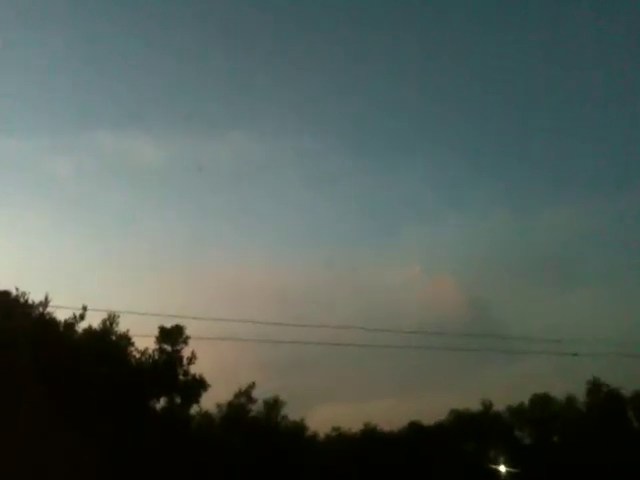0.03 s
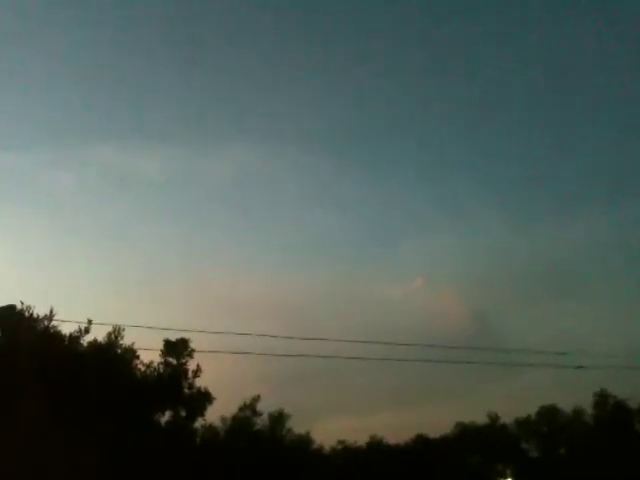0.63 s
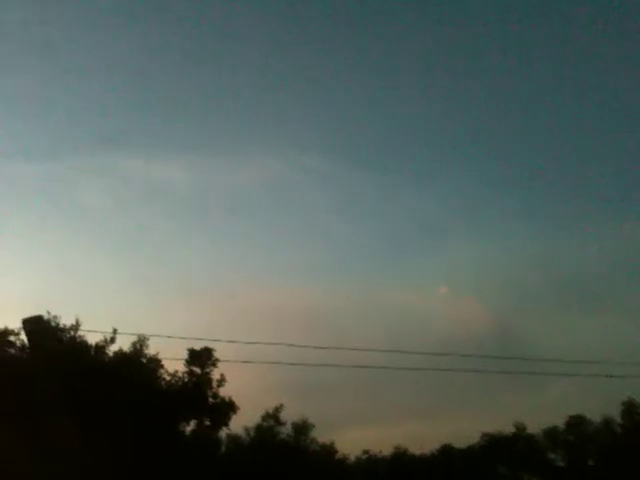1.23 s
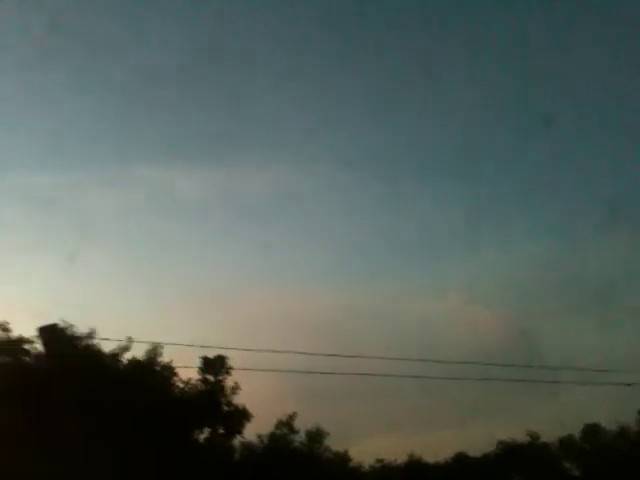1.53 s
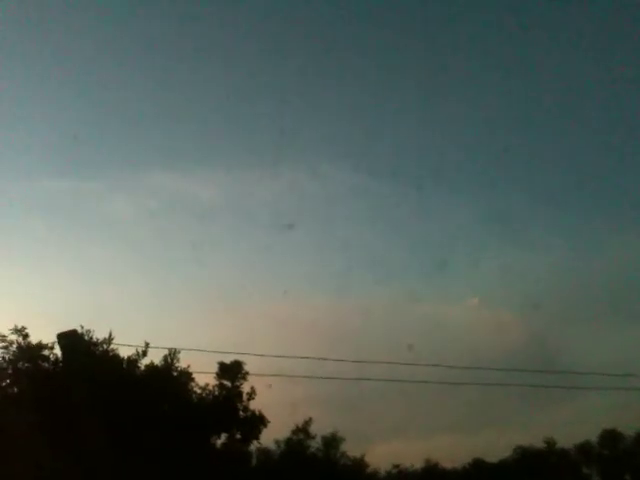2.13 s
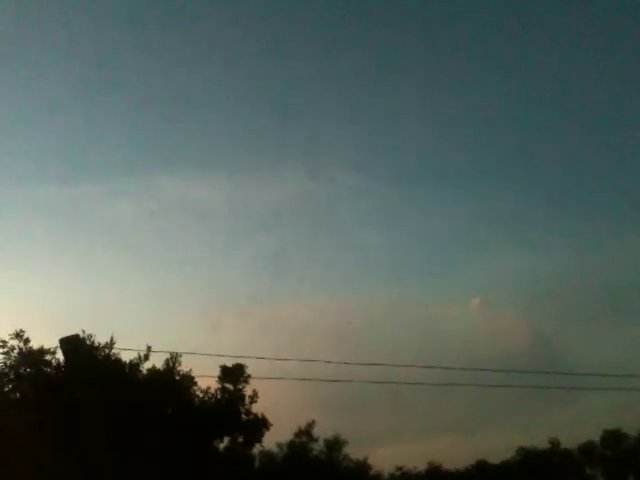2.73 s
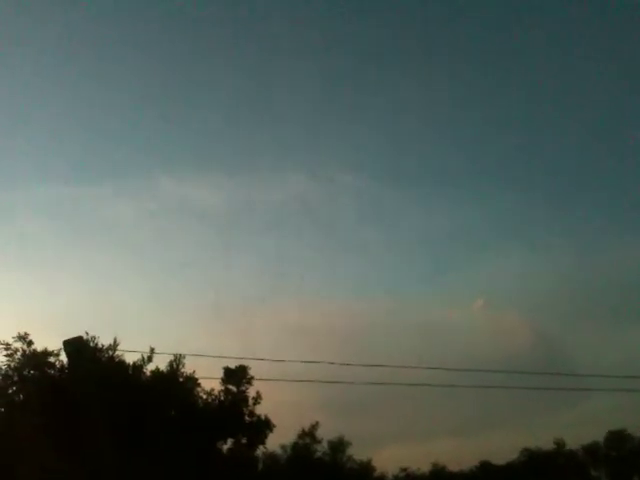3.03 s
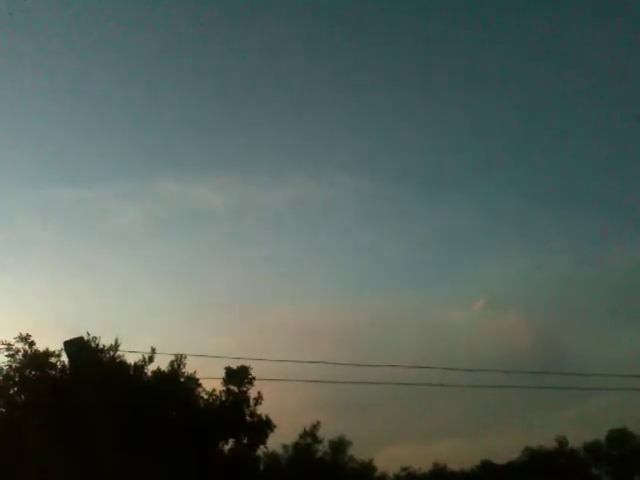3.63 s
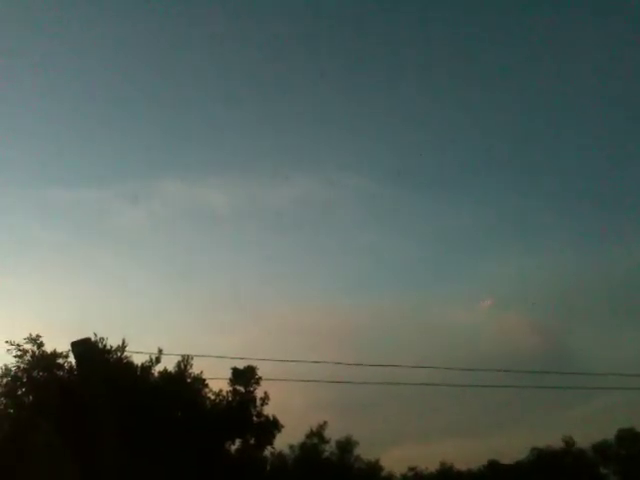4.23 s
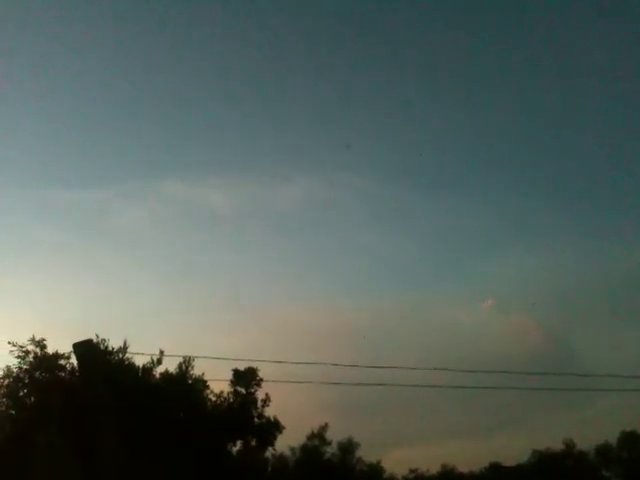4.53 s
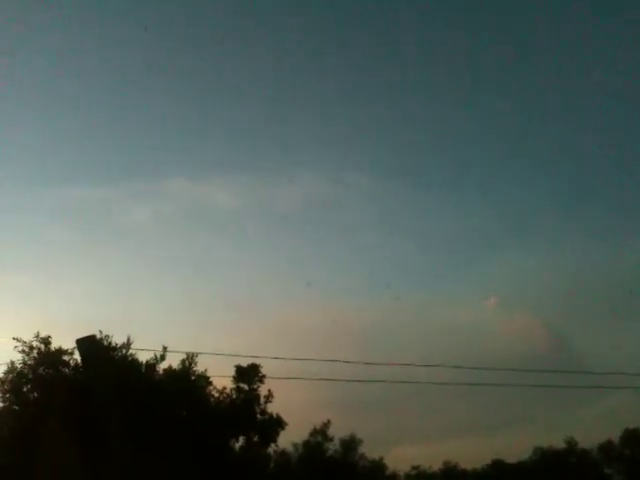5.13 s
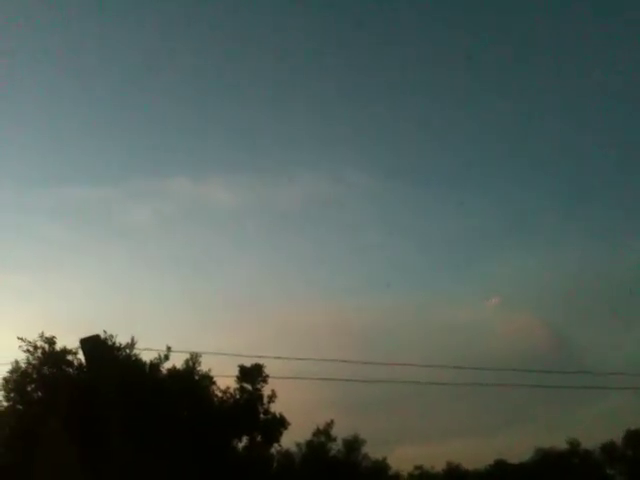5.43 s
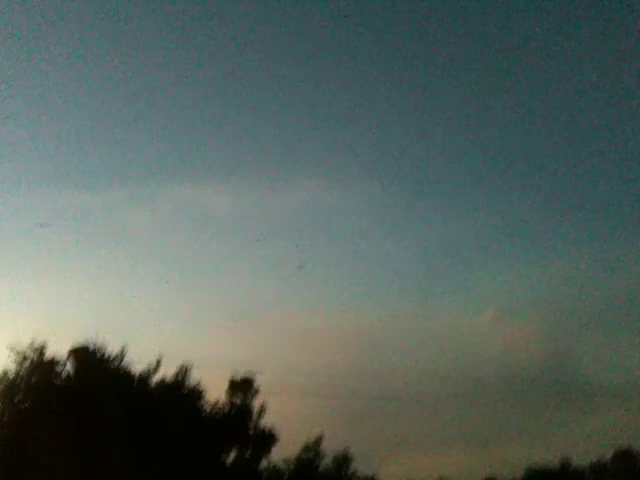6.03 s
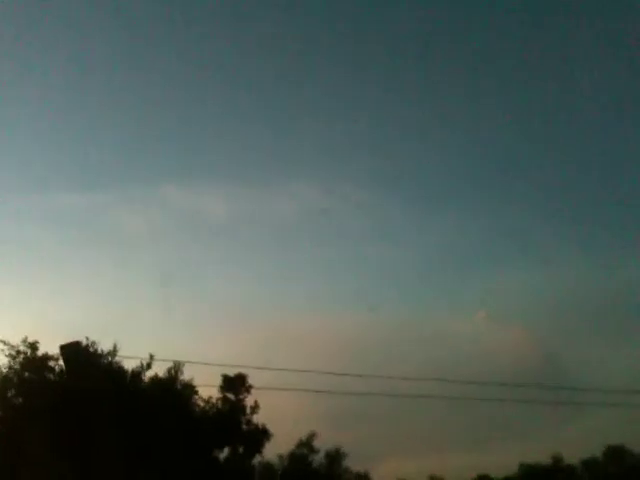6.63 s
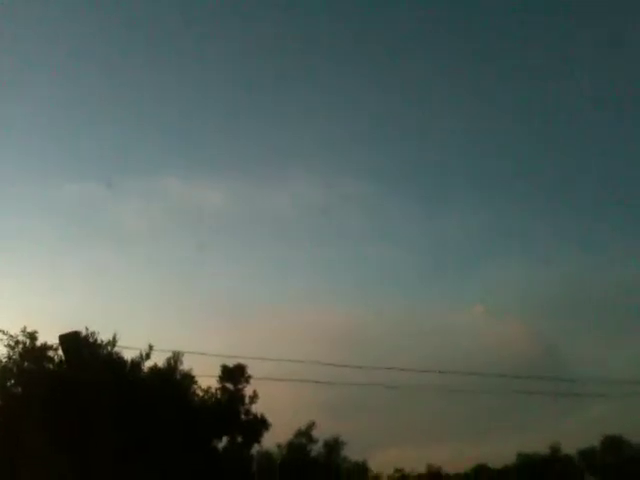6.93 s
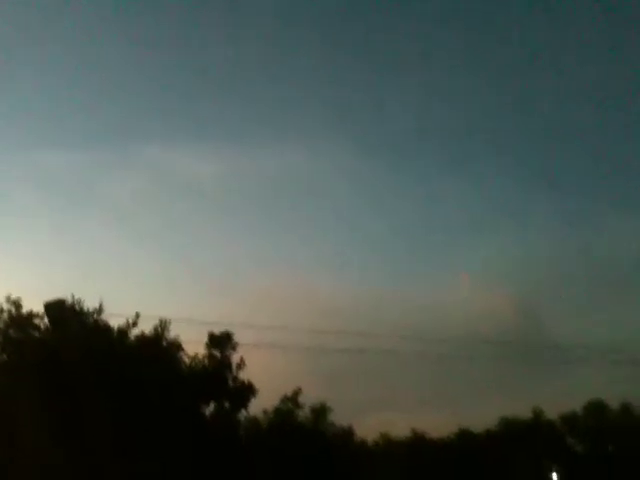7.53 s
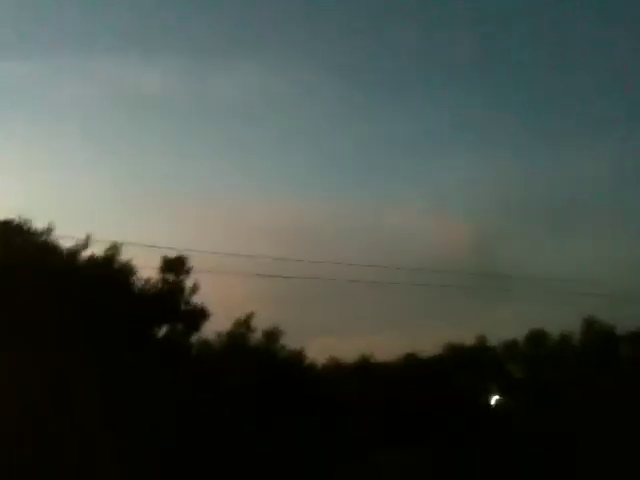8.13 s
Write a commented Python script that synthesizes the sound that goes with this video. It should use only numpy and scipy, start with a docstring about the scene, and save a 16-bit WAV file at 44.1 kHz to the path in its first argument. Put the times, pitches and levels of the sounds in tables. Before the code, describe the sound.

Uneven wind rumble and dull thumps hit the microphone close up, in an open place near trees. Faint bird whistles and quick twittering come first; then the wind eases and a far road hums softly. The gusts return, with brief, high bush cricket buzzes scattered throughout. Later a cluster of sharp handling clicks and a small scratch stands out, while a bird repeats its short whistle to the end.

```python
"""Breeze, birds and bush crickets at dusk

A light breeze buffets the microphone in gusts and single thumps, over leaves and the hush of a far road. One
bird repeats an arched whistle, another twitters, and two bush crickets, one near and one farther off, rub their
wings in short buzzes. A hand on the camera makes a few sharp ticks and a scratch; the camera hisses and whines
faintly."""
import sys
import numpy as np
from scipy import signal
from scipy.fft import rfft, irfft, next_fast_len
from scipy.io import wavfile
from scipy.ndimage import uniform_filter1d

SR = 44100
rng = np.random.default_rng(int(sys.argv[2]) if len(sys.argv) > 2 else 0)


def wav_record(signal):
    """Record a signal, one row per channel, as 16-bit PCM in the file named by sys.argv[1]."""
    frames = np.transpose(np.atleast_2d(signal))
    bounded = np.clip(frames, -1, 1)
    # unit amplitude maps onto the largest positive 16-bit level
    quanta = np.round(bounded * 32767).astype(np.int16)
    wavfile.write(sys.argv[1], SR, quanta)


N = 369116
T = np.arange(N) / SR


def wind(lump_db=3.5, lump_hz=24, edge_db=-19.5, edge_hz=450):
    """Air swirls unevenly at the microphone opening: a lumpy rumble with a higher edge."""
    # tone colour of the rumble: (frequency [Hz], relative level [dB])
    colour = [(25, -41), (114, -2), (171, 1), (243, -8), (349, -13.5), (700, -39), (910, -66)]
    lumps = np.clip(drift(lump_hz), -2, 2)
    force = wind_force() * from_db(lump_db * lumps)
    rumble = butter(coloured(colour), 485, "low", order=4)
    # even out the noise, so that the force sets its loudness
    rumble = rumble / np.sqrt(uniform_filter1d(rumble ** 2, size=1700) + 1e-9)
    edge = butter(rng.standard_normal(N), edge_hz, "low", order=4)
    edge = butter(edge, 198, "high")
    edge = rms_one(edge * np.exp(.5 * lumps))  # flares at the top of each lump
    return force * (rumble + from_db(edge_db) * edge)


def wind_force(breeze_boost_db=4.5):
    """How hard the air blows: a breeze with gusts that swell and fade on top."""
    # the breeze between gusts: (time [s], level before the boost [dB])
    breeze = [(0.0, -48.5), (0.28, -51), (1.0, -63), (1.12, -68.5), (1.82, -72), (2.0, -66), (2.75, -65.5),
              (3.05, -49.5), (3.57, -63.5), (4.03, -54), (4.24, -61), (6.18, -59), (6.6, -63.5),
              (7.62, -56.5), (8.37, -55)]
    # gusts: (time of the peak [s], length [s], level [dB])
    gusts = [(0.497, 0.19, -43.5), (0.956, 0.23, -50), (3.059, 0.13, -40.5), (3.894, 0.13, -47.5),
             (4.057, 0.18, -41), (5.127, 0.25, -48.5), (5.824, 0.1, -48), (6.15, 0.12, -41),
             (7.379, 0.13, -47), (7.768, 0.22, -44.5)]
    power = from_db(along(breeze)[0] + breeze_boost_db) ** 2
    for s, length, db in gusts:
        swell = np.cos(np.pi * np.clip((T - s) / length, -.5, .5)) ** 2
        power = power + from_db(db) ** 2 * swell
    return np.sqrt(power)


def wind_thumps(rise_s=0.0042, start_ratio=1.5, settle_s=0.0025, flick_hz=430, flick_s=0.0017):
    """Each swirl of air swings the pressure a few times, slowing down; its front is a higher flick."""
    # swirls: (time [s], peak level [dB], final pitch [Hz], peak level of the flick [dB])
    swirls = [(0.088, -38, 191, -41), (0.199, -28.5, 172, -38.5), (0.258, -29.5, 150, -62),
              (0.277, -29, 186, -39), (0.291, -27, 172, -33.5), (0.436, -26, 142, -34),
              (0.452, -34, 177, -40), (0.517, -34.5, 200, -49), (0.639, -40, 135, -64),
              (0.721, -30.5, 187, -43.5), (0.877, -34.5, 151, -71), (1.144, -37, 173, -73),
              (1.185, -39, 154, -74), (1.419, -44, 204, -47.5), (1.708, -46.5, 135, -61),
              (2.625, -40.5, 178, -58), (2.799, -38, 173, -61), (3.05, -30.5, 234, -46),
              (3.078, -29.5, 198, -47), (3.125, -38, 223, -48), (3.186, -34.5, 200, -44),
              (3.445, -37.5, 143, -54), (3.542, -37.5, 170, -52), (3.653, -33, 167, -49),
              (3.86, -36, 239, -40), (4.021, -32, 227, -45), (4.067, -32.5, 205, -50),
              (4.123, -34.5, 212, -39), (4.135, -30, 180, -39), (4.253, -39.5, 162, -62),
              (4.769, -36.5, 160, -57), (4.919, -37, 208, -42), (4.982, -37, 238, -44),
              (5.141, -31.5, 228, -39.5), (5.195, -38.5, 200, -54), (5.818, -34.5, 189, -50),
              (5.859, -36.5, 188, -50), (6.303, -32, 200, -48), (6.342, -27.5, 178, -32.5),
              (6.47, -29, 163, -55), (6.975, -39.5, 238, -64), (7.241, -29, 173.5, -71)]
    out, t = np.zeros(N), T[:SR // 16]
    thump_shape = (t / rise_s * np.exp(1 - t / rise_s)) ** 2
    flick_shape = (t / flick_s * np.exp(1 - t / flick_s)) ** 2
    for s, db, hz, flick_db in swirls:
        falling_hz = hz * (1 + (start_ratio - 1) * np.exp(-t / settle_s))
        swing = sine(falling_hz) * rng.choice([-1, 1])
        add(out, s, from_db(db) * swing * thump_shape)
        front_hz = flick_hz * (1 + 0.13 * rng.uniform(-2.1, 1))
        flick = np.sin(2 * np.pi * (front_hz * t + rng.random()))
        add(out, s + 0.001, from_db(flick_db) * flick * flick_shape)
    return out


def whistling_bird(waver=0.0039, flutter_db=2.0, dip_width=0.16, fall_from=0.68):
    """A bird whistles a nearly pure note that holds, dips in loudness, arches and falls away."""
    # whistles: (time [s], length [s], top pitch [Hz], level [dB], place of the dip [0-1],
    # depth of the dip [dB], level change of the ending [dB])
    whistles = [(-0.055, 0.22, 3143, -52.5, 0.32, 1.5, 3), (0.716, 0.2, 3128, -52.5, 0.5, 11, 2),
                (5.171, 0.18, 3305, -55, 0.13, 13, -14), (5.954, 0.2, 3287, -47.5, 0.28, 11.5, 0.5),
                (6.785, .222, 3220, -50, 0.57, 6, -6.5), (7.609, 0.225, 3210, -59, 0.2, 10, 0),
                (8.306, 0.28, 3175, -53.5, .5, 2, 0)]
    # shape of one whistle: (progress [0-1], pitch [share of top pitch], relative level [dB])
    arch = [(0, .91, -30), (.07, .982, -4), (.28, .978, -2), (.5, 1, 0), (.68, .995, -1), (.8, .965, -1),
            (.94, .915, -2), (1, .87, -14)]
    out = np.zeros(N)
    tremble, flutter = 1 + waver * drift(56), flutter_db * drift(32)
    for s, length, top_hz, db, dip_at, dip_db, ending_db in whistles:
        progress = np.linspace(0, 1, int(length * SR))
        now = np.clip(int(s * SR) + np.arange(len(progress)), 0, N - 1)
        ratio, shape_db = along(arch, progress)
        dip = dip_db * np.exp(-((progress - dip_at) / dip_width) ** 2)
        ending = ending_db * np.clip((progress - fall_from) / 0.26, 0, 1)
        gain = from_db(db + shape_db + flutter[now] - dip + ending)
        soft_ends = signal.windows.tukey(len(progress), .06)
        add(out, s, gain * sine(top_hz * ratio * tremble[now]) * soft_ends)
    return out


def twittering_bird(gap_s=.0265, chirp_s=0.019, top_hz=4720, bottom_hz=3760, grow_db=12, hook=1.55):
    """A bird sings quick runs of falling chirps; the first two of a run are weaker and start lower."""
    # runs: (start of the last chirp [s], chirps [count, rounded], full level [dB])
    runs = [(0.171, 5, -60.5), (0.474, 5.8, -58), (0.748, 4.6, -58.5), (1.062, 5.8, -60.5),
            (1.361, 5.4, -60), (1.555, 1, -56)]
    out, progress = np.zeros(N), np.linspace(0, 1, int(chirp_s * SR))
    for s, chirps, db in runs:
        count = int(round(chirps))
        for k in range(count):
            weakness = max(1 - k / 2, 0)
            start_hz = (top_hz - 250 * weakness) * rng.normal(1, 0.0096)
            hz = start_hz + (bottom_hz - start_hz) * progress ** hook
            chirp = sine(hz) * np.hanning(len(progress))
            add(out, s - (count - 1 - k) * gap_s, from_db(db - grow_db * weakness) * chirp)
    return out


def rising_call():
    """One faint bird note slides upward."""
    # course of the note: (time [s], pitch [Hz], level [dB])
    note = [(3.375, 3150, -80), (3.395, 3600, -67), (3.447, 3930, -70), (3.47, 4300, -77)]
    return glide(note)


def bush_cricket(bout_s=0.176, slow_s=.0085, fast_s=.0059, stroke_s=0.0061, grow_db=10):
    """Each wing stroke is a falling chirp ending in a low rasp; a buzz swells, then speeds up."""
    # buzzes of the near cricket and, weaker, of a farther one: (end time [s], full level [dB])
    buzzes = [(1.31, -69), (1.52, -61.5), (1.69, -67), (1.817, -61.5), (2.115, -60), (3.665, -59.5),
              (3.958, -59.5), (4.06, -68), (4.269, -59.5), (4.395, -68), (4.755, -67.5), (5.676, -60),
              (5.972, -58), (6.29, -45.5), (7.606, -61), (7.923, -63), (8.235, -59)]
    # one wing stroke: (progress [0-1], pitch [Hz], relative level [dB])
    stroke = [(0, 8320, -16), (.2, 7810, -8), (.46, 7450, -1.5), (.67, 7050, -36),
              (.83, 6680, -10.5), (1, 6700, -26)]
    progress = np.linspace(0, 1, int(stroke_s * SR))
    hz, stroke_db = along(stroke, progress)
    out, effort = np.zeros(N), np.zeros(N)
    for end, db in buzzes:
        s, tuning = end - bout_s, rng.normal(.99, 0.015)
        while s < end:
            done = 1 - (end - s) / bout_s
            gain = from_db(db - grow_db * (1 - done) ** 5 + rng.normal(0, 0.59))
            chirp = sine(hz * tuning * rng.normal(1, 0.0081))
            rasp = butter(rng.standard_normal(len(progress)), [5500, 9500], "band", order=1)
            add(out, s, gain * from_db(stroke_db) * (chirp + 0.087 * rasp))
            add(effort, s, gain * progress)  # the low rasp grows through each stroke
            s += (slow_s if done < 0.51 else fast_s) * rng.normal(1, 0.045)
    low_rasp = butter(effort * rng.standard_normal(N), [6470, 6810], "band")
    return out + 0.62 * low_rasp


def hand_ticks(snap_hz=6000, snap_octaves=0.23, hollow_hz=1280, thud_db=-11, thud_hz=240, thud_s=0.0047):
    """A hand taps the camera: a hollow-sounding spike, a bright snap and a brief thud of the case."""
    # taps: (time [s], peak of the spike [dB], treble limit of the spike [Hz], peak of the snap [dB])
    taps = [(2.953, -40, 710, -85), (5.4296, -27, 2160, -42), (5.942, -38.5, 2200, -70),
            (6.093, -36, 1200, -70), (6.1042, -32.5, 1420, -65), (6.1114, -15.5, 2490, -62),
            (6.157, -34.5, 2400, -47), (6.2434, -35, 2600, -55), (6.2549, -29.5, 2570, -45),
            (6.279, -32.5, 8040, -49)]
    out, click, t = np.zeros(N), signal.unit_impulse(SR // 20), T[:SR // 20]
    thud = -np.sin(2 * np.pi * thud_hz * t) * np.exp(-t / thud_s)
    snap = butter(click, snap_hz * 2 ** (snap_octaves * np.array([-.5, .5])), "band", order=1)
    notch = signal.iirnotch(hollow_hz, Q=1.24, fs=SR)
    for s, db, hz, snap_db in taps:
        spike = butter(click, hz, "low", order=6)
        spike = butter(spike, 230, "high")
        spike = spike + 0.51 * (signal.lfilter(*notch, spike) - spike)  # scoop out half of the middle
        knock = spike / np.abs(spike).max() + from_db(thud_db) * thud
        add(out, s, from_db(db) * knock + from_db(snap_db) * snap / snap.max())
    return out


def finger_scratch(level_db=-60, end_s=6.282, rise_db_per_s=190, grit_db=3, band_hz=(4200, 11000)):
    """A finger drags over the case: a gritty hiss that builds and stops dead as it slips off."""
    swell = from_db(level_db - rise_db_per_s * np.abs(end_s - T)) * (T < end_s)
    grit = from_db(grit_db * drift(400))
    return swell * rms_one(grit * butter(rng.standard_normal(N), band_hz, "band"))


def rustle(hand_s=6.125, hold_s=0.18, hand_db=-60.5, rise_db_per_s=240, fall_db_per_s=36):
    """Leaves stir softly, with one lull; the hand shifting on the camera adds one brief swell."""
    # stirring of the leaves: (time [s], level [dB])
    leaves = [(4.5, -73), (6.8, -68.5), (7.65, -88), (7.95, -70), (8.37, -66.5)]
    # tone colour of the rustle: (frequency [Hz], relative level [dB])
    colour = [(800, -1.5), (1150, -3.5), (1600, 2), (2800, -2), (4500, -5.5), (7000, -14.5), (12000, -25),
              (16000, -46)]
    before, after = np.maximum(hand_s - T, 0), np.maximum(T - hand_s - hold_s, 0)
    hand = from_db(hand_db - rise_db_per_s * before - fall_db_per_s * after)
    return np.hypot(from_db(along(leaves)[0]), hand) * coloured(colour)


def tree_echoes(sound, scatter_db=-11.0, fade_s=0.4, build_s=0.056, smear_s=0.0091):
    """The trees send a sound back: two blurred echoes and a soft wash scattered by the leaves."""
    # echoes: (delay [s], relative level [dB])
    echoes = [(0.062, -13.5), (0.146, -16.5)]
    t = T[:SR]
    tail = (from_db(-60 * t / fade_s) * (1 - np.exp(-t / build_s))) ** 2
    power = from_db(scatter_db) ** 2 * tail / tail.sum()
    for s, db in echoes:
        echo = np.exp(-((t - s) / smear_s) ** 2)
        power = power + from_db(db) ** 2 * echo / echo.sum()
    return signal.fftconvolve(sound, np.sqrt(power) * rng.standard_normal(SR))[:N]


def far_hush(level_db=-64.0, flicker_db=1.0):
    """A low hush from far away, flickering slightly in loudness."""
    # tone colour of the hush: (frequency [Hz], relative level [dB])
    colour = [(30, -21), (120, 16), (300, 1.5), (520, -7), (780, 6.5), (1130, -11.5), (1560, 0.5),
              (2000, -9), (2450, -2.5), (3200, -16), (4500, -16.5), (8000, -26.5)]
    return from_db(level_db + flicker_db * drift(9.5)) * coloured(colour)


def far_road():
    """The hum of a far road swells and slowly fades."""
    # tone colour of the hum: (frequency [Hz], relative level [dB])
    colour = [(400, -33), (680, -10), (800, 5), (950, 4.5), (1080, -35), (2500, -48)]
    # swell of the hum: (time [s], level [dB])
    swell = [(1.3, -94), (2.0, -72.5), (2.6, -74), (3.6, -82), (8.37, -95)]
    return from_db(along(swell)[0]) * coloured(colour)


def far_tyres(start_hz=1022, rise_hz_per_s=26, waver_db=3.0):
    """A far tyre tread sings on one note that creeps upward, fades and returns."""
    # loudness of the note: (time [s], level [dB])
    swell = [(2.12, -90), (2.21, -74.5), (2.57, -71), (2.7, -85), (3.02, -76.5), (3.14, -90)]
    note = [(s, start_hz + rise_hz_per_s * (s - swell[0][0]), db) for s, db in swell]
    return glide(note) * from_db(waver_db * drift(15))


def far_crickets(level_db=-90, band_hz=(7350, 8000)):
    """Many distant bush crickets merge into one thin, even sizzle."""
    return from_db(level_db) * rms_one(butter(rng.standard_normal(N), band_hz, "band"))


def camera_noise(hiss_db=-75.5, whine_db=-86, whine_hz=15000):
    """The electronics add a steady hiss and a thin whine whose wave flips over 60 times a second."""
    hiss = from_db(hiss_db) * rng.standard_normal(N)
    flip = np.tanh(6 * np.sin(2 * np.pi * 30 * T))
    return hiss + from_db(whine_db) * rms_one(flip * np.sin(2 * np.pi * whine_hz * T))


def from_db(db):
    """Turn decibels into a number to multiply by."""
    return 10 ** (np.asarray(db) / 20)


def rms_one(x):
    """Scale a signal so that its average strength (rms) is 1."""
    return x / np.sqrt(np.mean(x ** 2) + 1e-20)


def along(rows, at=T):
    """Join a table's rows by straight lines: one curve for each column after the first."""
    s, *columns = np.transpose(rows)
    return [np.interp(at, s, column) for column in columns]


def add(out, s, sound):
    """Mix a sound into out, starting at s seconds."""
    start = int(round(s * SR))
    part = sound[max(-start, 0):max(N - start, 0)]
    out[max(start, 0):max(start, 0) + len(part)] += part


def butter(x, hz, kind, order=2):
    """A Butterworth filter: keep the lows, the highs or a band."""
    return signal.sosfilt(signal.butter(order, np.clip(hz, 10, .45 * SR), kind, fs=SR, output="sos"), x)


def coloured(colour):
    """Noise of strength 1 with the given tone colour."""
    hz, db = np.transpose(colour)
    size = next_fast_len(N)
    log_hz = np.log(np.fft.rfftfreq(size, 1 / SR) + 1)
    gain = from_db(np.interp(log_hz, np.log(hz), db))
    return rms_one(irfft(rfft(rng.standard_normal(size)) * gain)[:N])


def drift(hz):
    """A smooth random wobble of strength 1; a higher hz makes it quicker."""
    return rms_one(butter(rng.standard_normal(N + SR), hz, "low")[SR:])


def sine(hz):
    """A tone that follows a pitch curve."""
    return np.sin(2 * np.pi * np.cumsum(hz) / SR)


def glide(rows):
    """A tone that follows rows of (time [s], pitch [Hz], level [dB]) and is silent outside them."""
    hz, db = along(rows)
    return sine(hz) * from_db(db) * (T > rows[0][0]) * (T < rows[-1][0])


def scene(cricket_echo_db=-11, bass_cut_hz=64):
    """Animals and far hush, with the wind, the hand and the camera's noise right at the microphone."""
    distance = far_hush() + far_road() + far_tyres()
    whistle, buzz = whistling_bird(), bush_cricket()
    echoes = tree_echoes(whistle + from_db(cricket_echo_db) * buzz)
    animals = whistle + buzz + echoes + twittering_bird() + rising_call() + far_crickets()
    close = wind() + wind_thumps() + hand_ticks() + finger_scratch()
    close = butter(close, bass_cut_hz, "high")  # the small microphone opening holds back deep bass
    return (close + animals + distance + camera_noise() + rustle())[None]


def record(dry, cutoff_hz=15800):
    """The highest treble is cut off steeply."""
    return signal.sosfilt(signal.ellip(12, .1, 70, cutoff_hz, fs=SR, output="sos"), dry)


dry = scene()
out = record(dry)
wav_record(out)
```